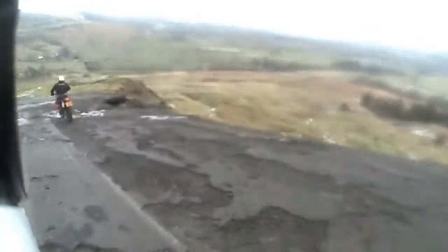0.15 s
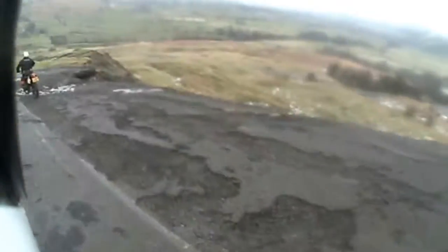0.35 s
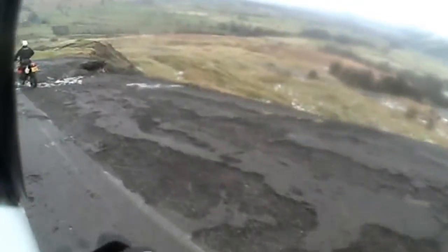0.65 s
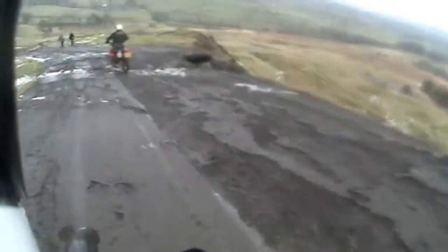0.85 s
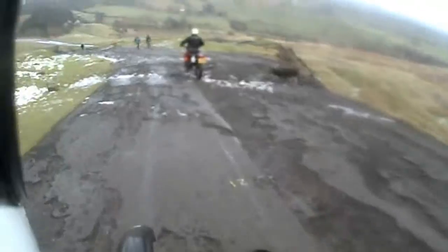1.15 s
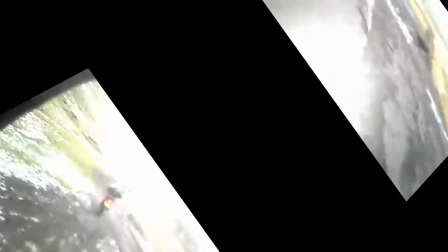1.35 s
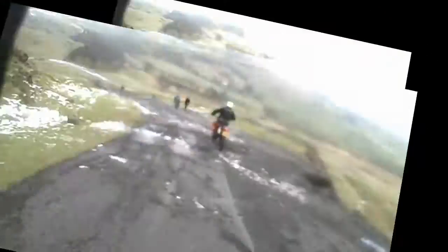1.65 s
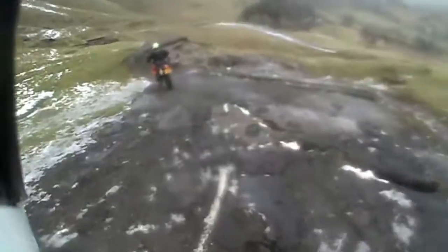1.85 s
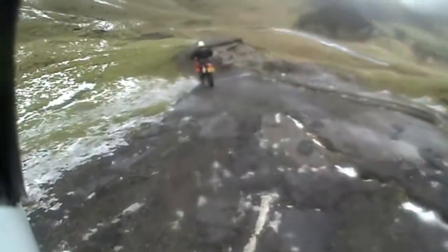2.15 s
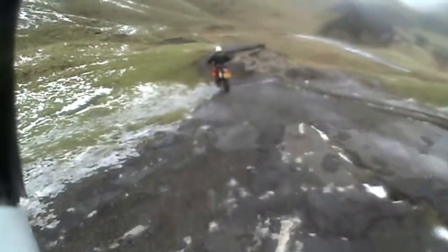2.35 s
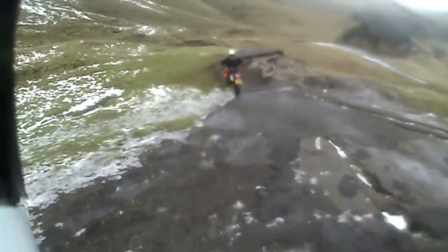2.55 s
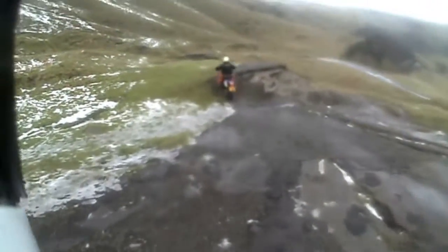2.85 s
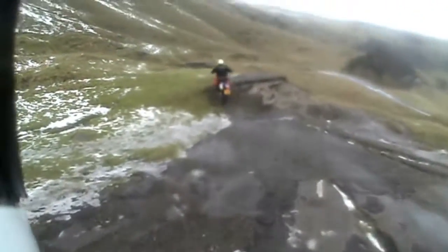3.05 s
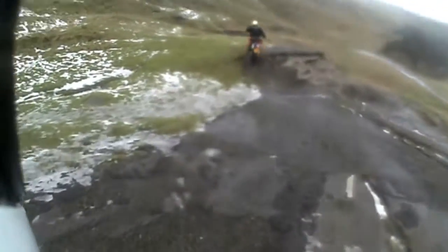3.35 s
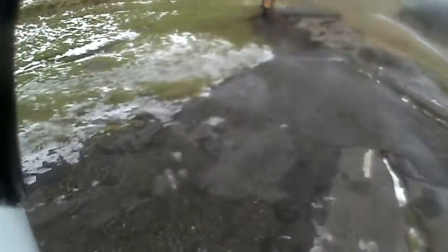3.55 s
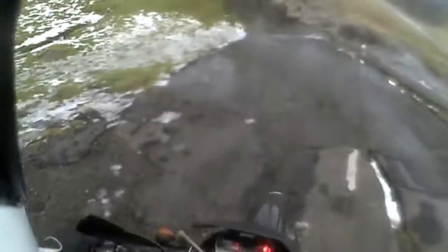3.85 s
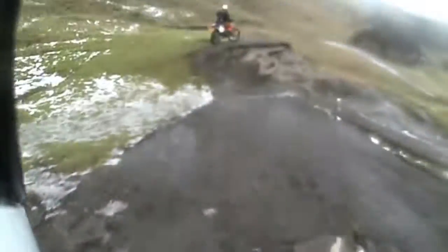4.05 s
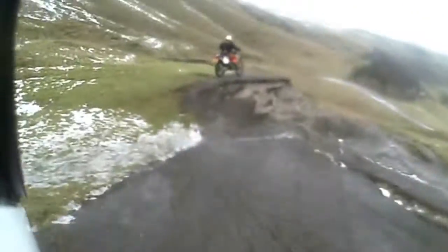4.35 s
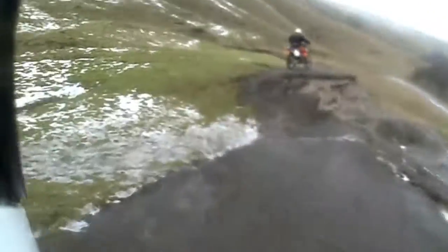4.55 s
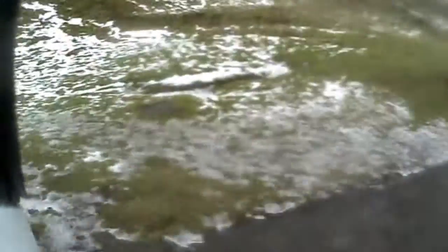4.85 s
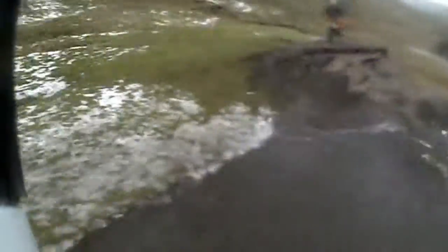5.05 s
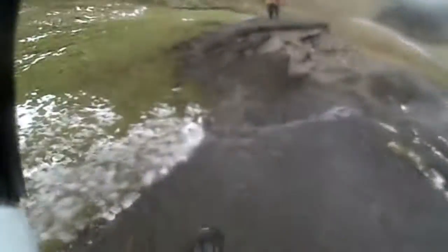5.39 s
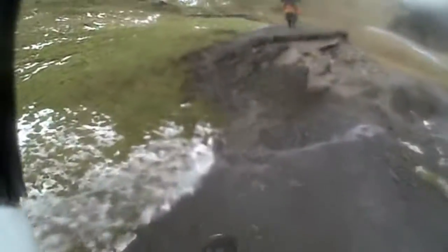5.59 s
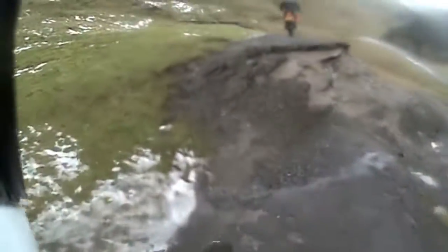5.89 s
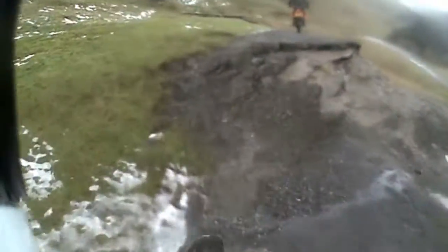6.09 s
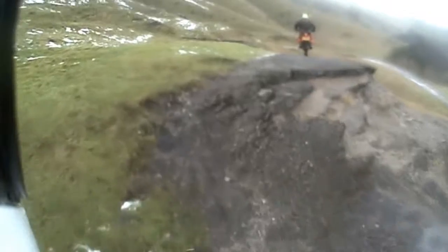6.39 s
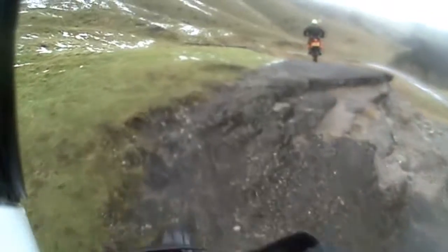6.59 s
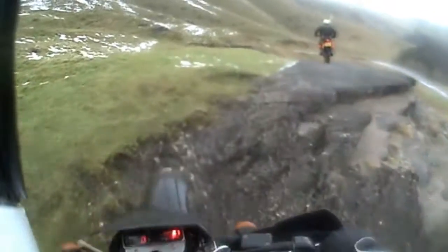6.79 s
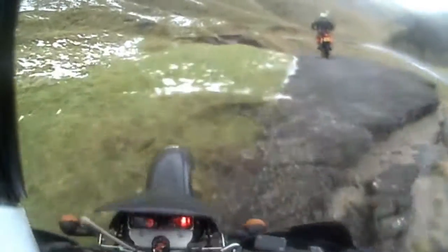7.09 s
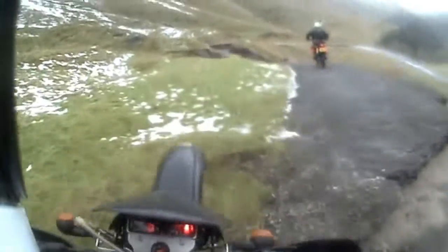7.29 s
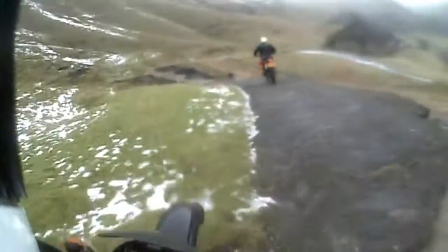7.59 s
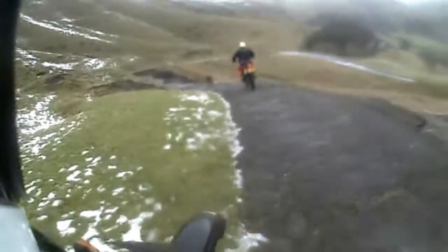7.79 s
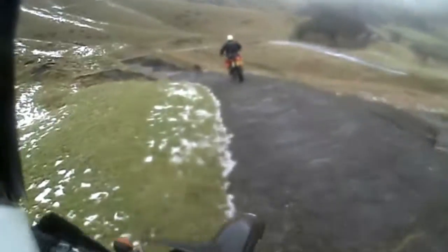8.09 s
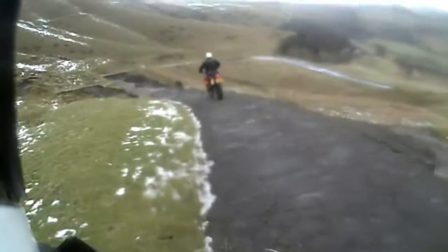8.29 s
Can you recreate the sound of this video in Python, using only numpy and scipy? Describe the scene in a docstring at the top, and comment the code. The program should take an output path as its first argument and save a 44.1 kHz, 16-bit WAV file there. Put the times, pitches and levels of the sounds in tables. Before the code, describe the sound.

A single-cylinder motorbike thumps along slowly near idle, then revs in blips and a harder pull, with metallic clatter, rattles and jolts.

```python
"""Trail bike on a rough track

A single-cylinder four-stroke bike heard from the rider's helmet, its speed rising and falling.
Each firing adds shaped pulses: an exhaust thump and pop, a ringing silencer and an intake throb.
Noise and sharp blows ring the metal as clatter, hiss and singing; bursts rattle loose parts.
Low swings mark the jolts, and filtered noise makes light wind on the microphone."""
import sys
import numpy as np
from scipy import signal
from scipy.io import wavfile
from scipy.ndimage import uniform_filter1d

SR = 44100
rng = np.random.default_rng(int(sys.argv[2]) if len(sys.argv) > 2 else 0)


def generate_wav(signal):
    """Clip the signal to [-1, 1] and save it as 16-bit WAV at the path in sys.argv[1]."""
    frames = np.transpose(np.atleast_2d(signal))
    scaled = np.clip(frames, -1, 1) * 32767
    pcm = np.round(scaled).astype(np.int16)
    wavfile.write(sys.argv[1], SR, pcm)


N = 371762
TIME = np.arange(N) / SR
IDLE_RATE = 14.0  # firings per second
IDLE_RING_DB = -51  # silencer setting taken as normal at idle


def undb(db):
    """Turn a level in dB into a gain."""
    return 10 ** (np.asarray(db) / 20)


def unit(x):
    """Scale to an rms level of 1."""
    return x / np.sqrt(np.mean(x ** 2))


def ring(x, hz, width_hz):
    """One resonance, with gain 1 at its centre."""
    return signal.lfilter(*signal.iirpeak(hz, hz / width_hz, SR), x)


def body(x, modes):
    """Several resonances of one part; neighbours swing in opposite senses."""
    total = 0
    for k, (hz, width_hz, db) in enumerate(modes):
        total = total + (-1) ** k * undb(db) * ring(x, hz, width_hz)
    return total


def curves(table):
    """Join the points of each table column by straight lines over time."""
    time_s, *columns = np.transpose(table)
    return [np.interp(TIME, time_s, column) for column in columns]


def walk(rate):
    """Random levels, new rate times a second, smoothed twice and scaled to rms near 1."""
    hold = int(SR / rate)
    steps = np.repeat(rng.standard_normal(N // hold + 1), hold)
    smooth = uniform_filter1d(uniform_filter1d(steps, hold), hold)
    return unit(smooth[:N])


def grit(spread_db):
    """Dense tiny impacts of uneven size."""
    return rng.standard_normal(N) * undb(spread_db * rng.exponential(size=N))


def bell(x):
    """Smooth hump of height 1 and spread 1."""
    return np.exp(-x ** 2 / 2)


def span(start, end, fade):
    """1 between start and end, with soft edges."""
    return np.clip(np.minimum(TIME - start, end - TIME) / fade + .5, 0, 1)


def lay(at, shapes, lead):
    """Add one row of samples at each place, begun lead samples early."""
    out = np.zeros(N + 2 * shapes.shape[1])
    np.add.at(out, at[:, None] + np.arange(shapes.shape[1]), shapes)
    return out[lead:lead + N]


# How the silencer's overtones sound:
# (pitch as a multiple of the main ring, fade per s, level_db)
OVERTONES = [(1.901, 83, -17), (2.201, 71, -20.5), (3.701, 110, -21)]
SILENCER_HZ, SILENCER_RISE_HZ = 279.5, 1.11  # at idle; rise per extra firing a second: hotter gas
POP_HZ, PIPE_HZ = 229.3, 98.5


def exhaust(cycle, rate):
    """Each firing: blow-down pulse, its return along the pipe, a pop, a ringing silencer, an intake stroke."""
    fired = np.flatnonzero(np.diff(np.floor(cycle)))
    scatter_db = np.array([0.52, 1.2, 1.5, 1.3, 0.75]) * rng.standard_normal((len(fired), 5))
    scatter = undb(scatter_db).T[..., None]
    blow, back, pop, silencer = (undb(level_db[fired, None]) for level_db in gas(rate))
    fast = rate[fired, None]
    extra = fast - IDLE_RATE
    open_throttle = np.clip(silencer / undb(-34.5), 0, 1)  # a loud silencer means a wide throttle
    lead = 512  # samples before the firing
    s = (np.arange(4096) - lead) / SR  # seconds after the firing

    rise = (s - .0085) / 0.0035
    blow = blow * (1 - rise ** 2) * bell(rise)  # a push between two suctions

    late = s - .0205 + 0.00006 * extra  # the wave returns sooner in hot gas
    age = np.clip(late, 0, 1)
    pipe_level = 0.29 * np.minimum(fast / IDLE_RATE, 1.5) ** 1.4 * (1 - 1.9 * open_throttle)
    pipe_fade = np.exp(-age / 0.035) * (1 - np.exp(-age / 0.0048))
    back = back * (bell(late / 0.0026) + pipe_level * np.cos(2 * np.pi * PIPE_HZ * age) * pipe_fade)

    share = np.sqrt(IDLE_RATE / fast)  # the pop level is rms, so each firing carries less at speed
    pop_wave = np.cos(2 * np.pi * POP_HZ * (s - .0072)) * bell((s - .0075) / 0.0036)
    pop = -undb(11.5) * pop * share * pop_wave

    age = np.clip(s - .004, 0, 1)
    hz = SILENCER_HZ + SILENCER_RISE_HZ * extra
    fill = 0.0067 + 0.000079 * extra  # at speed the silencer swells more slowly and empties sooner
    swell = (1 - np.exp(-(age / fill) ** 2)) * np.exp(-age * (42 + 2.5 * extra))
    chord = 0
    for ratio, fade, db in OVERTONES:
        envelope = age * fade * np.exp(1 - age * fade)
        chord = chord + undb(db) * np.sin(2 * np.pi * ratio * hz * age) * envelope
    main_ring = swell * np.sin(2 * np.pi * hz * (age - .0007))
    silencer = undb(12.5) * silencer * (main_ring + open_throttle * chord)

    stroke = s * fast - .43  # in cycles: tied to the crank, not to the clock
    intake = -undb(-44.5 + 0.19 * extra) * np.sin(2 * np.pi * 2 * stroke) * bell(stroke / 0.1)
    layers = np.array([blow, back, pop, silencer, intake])
    return lay(fired, np.sum(scatter * layers, axis=0), lead)


# How the exhaust speaks as the throttle is worked, before changes with speed and scatter:
# (time_s, share of the thump's power in the first pulse [0-1], tailpipe pop_db, silencer ring_db)
THROTTLE = [(0, 0.36, -52.5, -53), (.7, 0.38, -52.5, -54), (1.5, 0.54, -51, -52), (2.1, 0.57, -51, -52.5),
            (3.55, 0.6, -51, -52), (3.72, 0.76, -51, -56), (3.9, 0.4, -43.5, -47), (4.14, .45, -50, -54.5),
            (4.5, 0.5, -49, -52.5), (4.58, 0.4, -40.5, -47.5), (4.66, 0.2, -44, -47),
            (4.78, 0.06, -53.5, -49), (4.96, 0.03, -50.5, -45), (5.2, 0, -50.5, -56.5),
            (5.36, 0.26, -52.5, -58), (5.57, .55, -48.5, -54), (5.68, 0.2, -44.5, -47),
            (5.8, 0.2, -51, -54.5), (5.9, 0.6, -51, -54), (6, .5, -43, -46.5), (6.09, 0, -45, -48),
            (6.2, 0, -47, -43), (6.55, 0, -46.5, -42.5), (6.9, .01, -45.5, -42.5), (6.98, .01, -61, -43.5),
            (7.05, .95, -68, -48), (7.16, 0.7, -64, -50.5), (7.26, 0.7, -45.5, -38),
            (7.37, 0.1, -47.5, -39), (7.52, 1, -72, -49.5), (7.58, 0.2, -57, -49), (7.7, 0, -57, -50),
            (7.84, 0.13, -55, -56), (8.04, .4, -52.5, -56), (8.25, 0.5, -49, -51.5), (8.43, 1, -55, -51.5)]
# Weak firings: (centre time_s, level change_db)
STUMBLES = [(4.38, -12.5), (5.93, -4)]
STUMBLE_S = .025  # spread of each dip
# base level at idle; rise per extra firing a second; ceiling, all before the throttle's share
THUMP_DB, THUMP_DB_PER_RATE, THUMP_TOP_DB = -35, 0.6, -31.5


def gas(rate):
    """Throttle and speed set the levels in dB of blow-down pulse, returning pulse, pop and silencer ring."""
    share, pop_db, ring_db = curves(THROTTLE)
    share = np.clip(share, 1e-4, 1 - 1e-4)
    weak_db = sum(db * bell((TIME - s) / STUMBLE_S) for s, db in STUMBLES)
    thump_db = np.minimum(THUMP_DB + THUMP_DB_PER_RATE * (rate - IDLE_RATE), THUMP_TOP_DB)
    thump_db = thump_db + 0.072 * (ring_db - IDLE_RING_DB)  # fuller under throttle
    first_db = thump_db + 10 * np.log10(share)
    return_db = thump_db + 10 * np.log10(1 - share)
    return weak_db + np.array([first_db, return_db, pop_db, ring_db])


def puffs(cycle, lead, fade, steady, scatter_db):
    """Envelope that jumps lead cycles ahead of the firing and fades over fade cycles to a steady share."""
    turn = cycle + lead
    sizes = undb(scatter_db * rng.standard_normal(int(turn[-1]) + 2))
    return steady + sizes[turn.astype(int)] * np.exp(-(turn % 1) / fade)


def blows(cycle, lead, scatter_db):
    """One clean blow a cycle, lead cycles ahead of the firing."""
    at = np.flatnonzero(np.diff(np.floor(cycle + lead)))
    out = np.zeros(N)
    out[at] = undb(scatter_db * rng.standard_normal(len(at)))
    return out


# Resonances of the engine cases: (pitch_hz, width_hz, level_db)
CASES = [(375, 222, -2.5), (594.7, 106, 3), (745, 128.5, -2.5), (1194, 86, -5), (1384, 161, -11.5)]
# Resonances of the valve cover: (pitch_hz, width_hz, level_db)
COVER = [(1720, 730, -9.5), (2144, 163, 2), (2430, 750, -7.5)]
# Resonances of the cooling fins: (pitch_hz, width_hz, level_db)
FINS = [(3910, 1000, -12), (4613, 407, 5), (4965, 1184, 1.5), (5345, 235, 4.5), (6110, 620, -12),
        (8000, 1500, -16.5)]
# How hard the ground shakes the bike; also moves the wind level: (time_s, level_db)
SHAKE = [(0, -1), (1.3, -0.5), (2.6, 0), (3.5, .5), (4.5, 1), (4.8, -1.5), (5.25, 1.5), (6, 1), (6.5, -2),
         (6.95, 2.5), (7.3, 3), (7.8, 5.5), (8.1, 1.5), (8.43, 2.5)]
# Metal noise: (base dB, dB per extra firing a second, dB per dB of silencer ring, dB per dB of shaking)
CASES_LAW = (-53, 0.1844, .05, 0.68)
COVER_LAW = (-69.5, 0.3941, 0.41, 0.7)
HISS_LAW = (-64.5, 0.493, 0.14, 0.53)
PULL_S, PULL_CLACK = (6.1, 6.64), 1.83  # a hard steady pull makes the valve clack stand out
PULL_PITCHED_UNTIL_S = 6.95  # the cases carry the engine's pitch until the throttle shuts


def clatter(cycle, rate):
    """Combustion knock and valves shake cases and cover each cycle; fins and chain hiss almost evenly."""
    ring_db = gas(rate)[3]
    shake_db, = curves(SHAKE)

    def level(law):
        """Gain of one metal noise from speed, throttle and shaking."""
        db, per_rate, per_db, per_shake = law
        throttle_db = per_db * (ring_db - IDLE_RING_DB)
        return undb(db + per_rate * (rate - IDLE_RATE) + throttle_db + per_shake * shake_db)

    load = undb(np.minimum(ring_db + 39.5, 1.5))  # throttle, read from the silencer level
    # under throttle a valve clacks at the firing
    clack = (load + PULL_CLACK * span(*PULL_S, 0.026)) * puffs(cycle, 0.095, .06, 0, 1.6)
    # pulling at speed the knocks merge
    roar = 0.85 * (1 + 1.2 * np.clip(load, 0, 1) * (rate / IDLE_RATE - 1))
    knock = puffs(cycle, 0.25, 0.51, roar, 0.71) + puffs(cycle, 0.14, 0.0054, 0, 3.1)

    # blows alike each cycle, so they carry pitch
    early_blows = 22 * (rate / IDLE_RATE) ** 0.73 * blows(cycle, .22, 1.6)
    pull = 12 * load + 25 * span(PULL_S[0], PULL_PITCHED_UNTIL_S, .1)
    struck = early_blows + pull * blows(cycle, 0.025, 0.83)
    cases = unit(body(knock * grit(0.64) + struck, CASES))

    cover_noise = (1 + 1.1 * clack) * undb(0.78 * walk(12)) * grit(0.91)
    cover_blows = 12 * load * blows(cycle, 0.048, 2.3)
    cover = unit(body(cover_noise + cover_blows, COVER))

    fin_noise = (1 + .4 * clack) * undb(1.5 * walk(25)) * grit(1.4)
    fins = unit(body(fin_noise, FINS))
    return level(CASES_LAW) * cases + level(COVER_LAW) * cover + level(HISS_LAW) * fins


# Narrow ringing of the metal that comes and goes: (start_s, end_s, pitch_hz, level_db)
SINGING = [(1.1, 1.5, 2180, -71.5), (4.6, 5.8, 2150, -80), (6.08, 6.27, 1180, -65),
           (6.35, 6.56, 1500, -60.5), (6.664, 6.92, 1094, -53), (6.85, 7.322, 2166, -61),
           (6.894, 7.22, 599, -46.5)]
SINGING_WIDTH_HZ, SINGING_FADE_S = 45, .05


def singing():
    """Single resonances of the metal, fed by vibration for a while."""
    total = 0
    for start, end, hz, db in SINGING:
        tone = unit(ring(grit(1.3), hz, SINGING_WIDTH_HZ))
        total = total + undb(db) * span(start, end, SINGING_FADE_S) * tone
    return total


# Loose parts rattling after a jolt, levels before the swell and fade:
# (start_s, length_s, level_db, rise_s)
RATTLES = [(0.213, 0.073, -56.5, .015), (0.342, 0.0055, -66, .001), (1.714, 0.03, -48.5, 0.00039),
           (1.852, .04, -55.5, .01), (3.422, 0.055, -45.5, 0.02), (4.419, .055, -49.5, 0.015),
           (6.4, 0.012, -65, .001), (7.649, 0.017, -48.5, 0.0021), (8.38, 0.077, -51, 0.014)]
# Resonances of a loose part: (pitch_hz, width_hz, level_db)
PART = [(900, 430, 5), (2650, 220, -3.5), (4080, 750, -4.5), (8040, 1100, -11)]
CRACK_DB, CRACK_HZ, CRACK_WIDTH_HZ = 3, 7500, 2400  # bright edge; width of each of two passes


def rattles():
    """Short bursts of small impacts ringing a loose part; sudden ones begin with a bright crack."""
    shaken, sudden = np.zeros(N), np.zeros(N)
    for s, length, db, rise_s in RATTLES:
        age = np.clip(TIME - s, 0, 1)
        burst = undb(db) * (1 - np.exp(-age / rise_s)) * np.exp(-(age / length) ** 2)
        shaken += burst
        sudden += burst * np.exp(-age / .01 - rise_s / 0.0025)  # a slow rise gets little crack

    def edge(x):
        """Keep the bright band of the crack."""
        return ring(ring(x, CRACK_HZ, CRACK_WIDTH_HZ), CRACK_HZ, CRACK_WIDTH_HZ)

    impacts = unit(grit(2.6))
    rattle = body(shaken * impacts, PART) / np.std(body(impacts, PART))
    crack = edge(sudden * impacts) / np.std(edge(impacts))
    return rattle + undb(CRACK_DB) * crack


# The suspension takes a bump: (centre time_s, peak level_db)
JOLTS = [(0.867, -37.5), (1.829, -36), (3.99, -43), (5.024, -30.5), (5.168, -39), (7.23, -39), (7.54, -50)]
JOLT_HZ = 33.6


def jolts():
    """One low swing of the helmet for each bump."""
    total = 0
    for s, db in JOLTS:
        after = TIME - s
        total = total - undb(db) * np.cos(2 * np.pi * JOLT_HZ * after) * bell(after / 0.022)
    return total


WIND_DB, WIND_HZ = -56, 30  # level before gusts and shaking; centre of the rumble


def wind():
    """Low gusts on the microphone port, their level following the shaking."""
    gust = undb(1.5 * walk(4))
    rumble = unit(ring(ring(rng.standard_normal(N), WIND_HZ, 94), WIND_HZ, 120))
    return undb(WIND_DB + 0.95 * curves(SHAKE)[0]) * gust * rumble


# How fast the engine fires: (time_s, firings per second)
REVS = [(0.0, 15.61), (0.236, 13.69), (0.454, 15.3), (0.811, 15.92), (0.91, 15.0), (1.428, 15.9),
        (1.698, 13.88), (2.59, 14.63), (2.81, 13.74), (2.972, 14.73), (3.263, 13.63), (3.396, 14.41),
        (3.711, 14.72), (3.984, 21.82), (4.117, 17.36), (4.492, 15.2), (4.672, 25.84), (4.804, 22.61),
        (5.03, 24.34), (5.187, 20.63), (5.581, 18.0), (5.717, 23.47), (5.904, 16.28), (6.012, 17.79),
        (6.085, 23.63), (6.262, 26.94), (6.731, 26.86), (6.87, 30.63), (6.972, 26.04), (7.158, 24.68),
        (7.385, 34.82), (7.51, 27.59), (7.734, 21.37), (8.43, 14.69)]
START_CYCLE = .6165  # how far into a cycle the engine begins


def scene():
    """The bike under the rider, in the open."""
    rate, = curves(REVS)
    cycle = START_CYCLE + np.cumsum(rate) / SR  # whole numbers are firings
    bike = exhaust(cycle, rate) + clatter(cycle, rate) + singing()
    return (bike + rattles() + jolts() + wind())[None]


SELF_NOISE_DB, TOP_HZ = -92, 8550  # noise before the filters; upper edge of the band


def record(dry):
    """A little self-noise, then the narrow band of a small camera."""
    noisy = dry + undb(SELF_NOISE_DB) * rng.standard_normal(dry.shape)
    low_cut = signal.butter(1, 14, "high", fs=SR, output="sos")
    high_cut = signal.ellip(10, .2, 60, TOP_HZ, fs=SR, output="sos")
    return signal.sosfilt(high_cut, signal.sosfilt(low_cut, noisy))


dry = scene()
out = record(dry)
generate_wav(out)
```